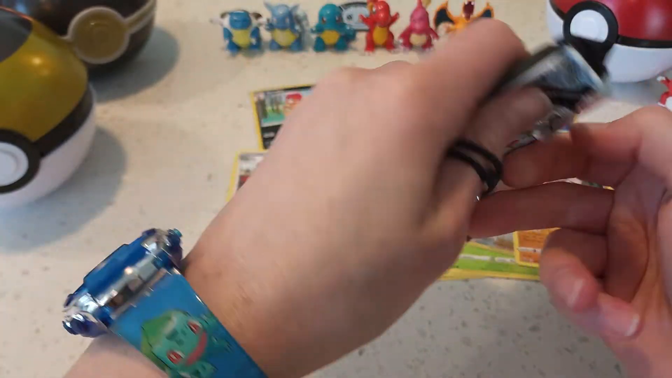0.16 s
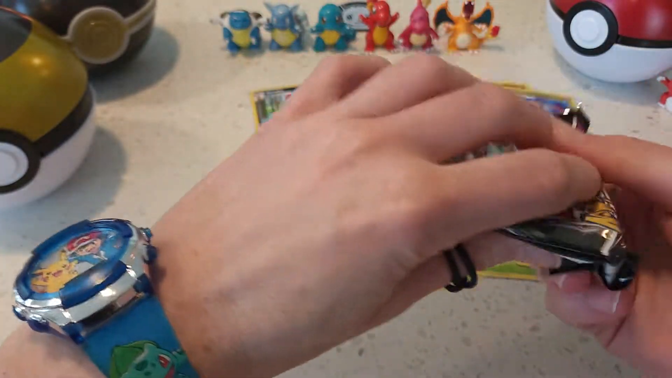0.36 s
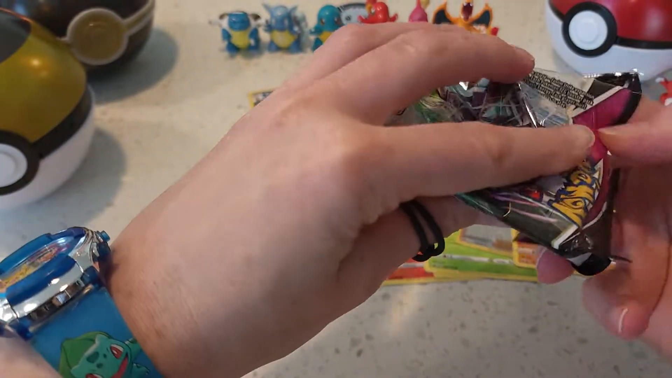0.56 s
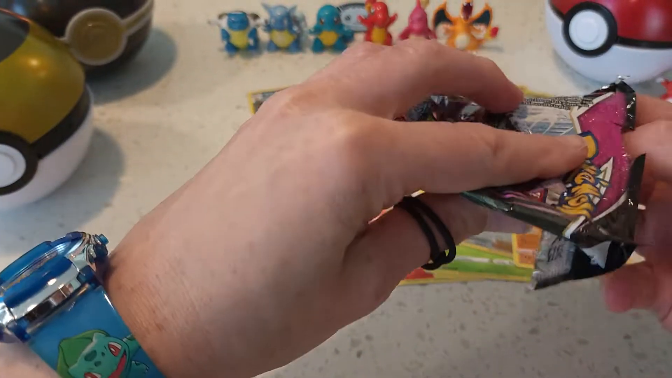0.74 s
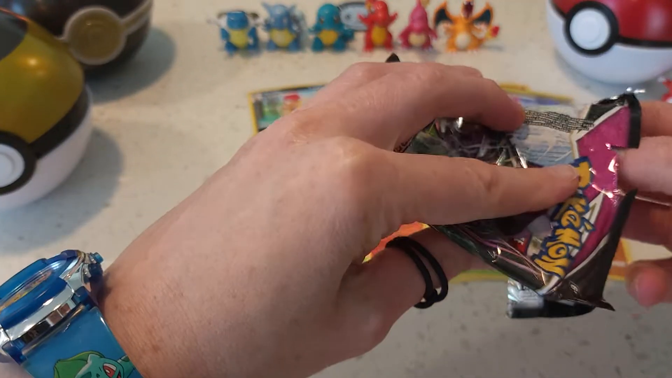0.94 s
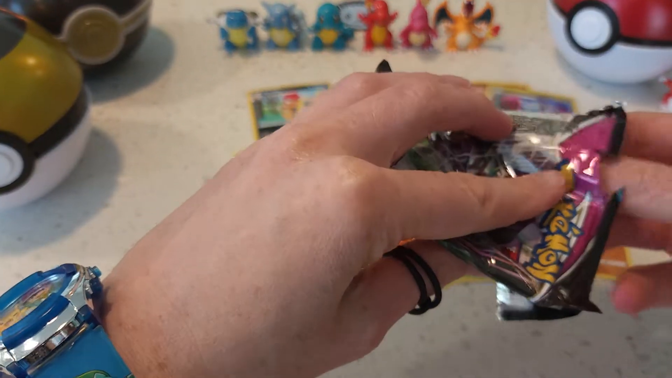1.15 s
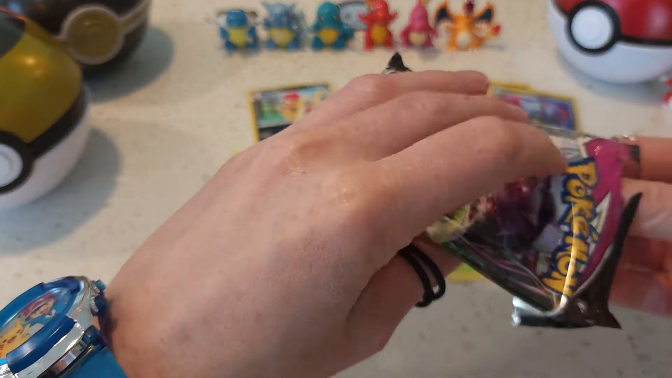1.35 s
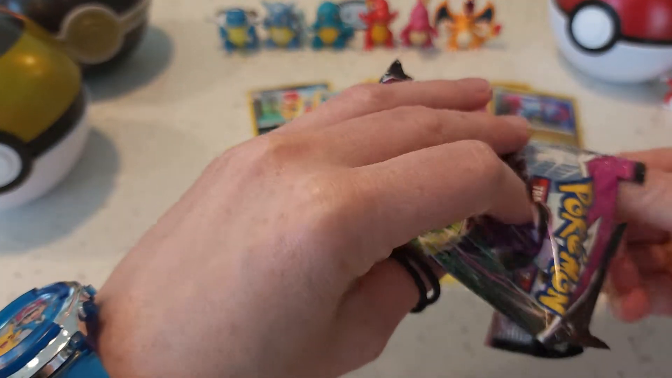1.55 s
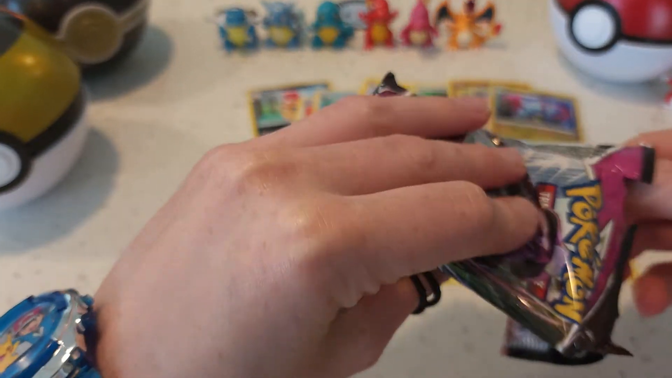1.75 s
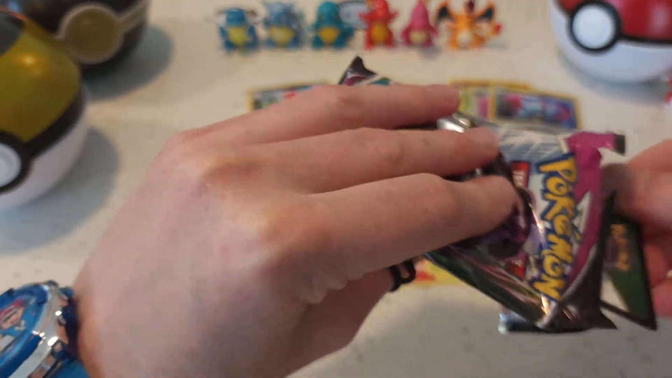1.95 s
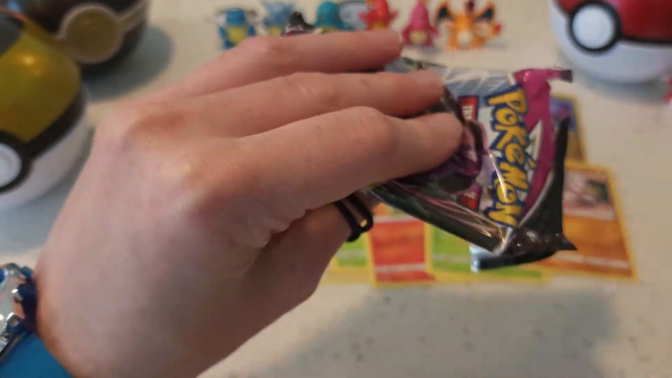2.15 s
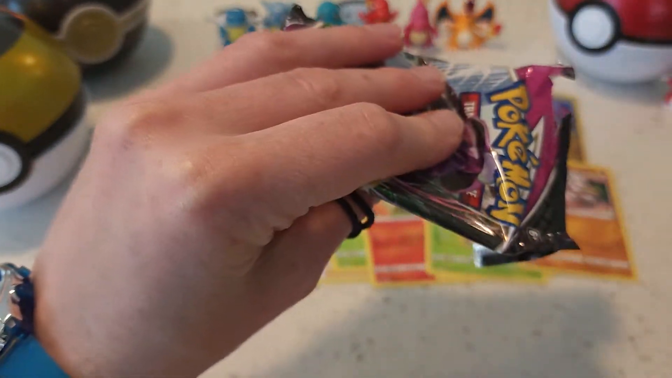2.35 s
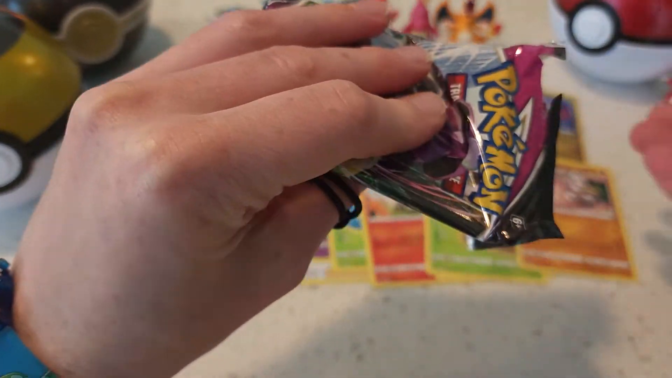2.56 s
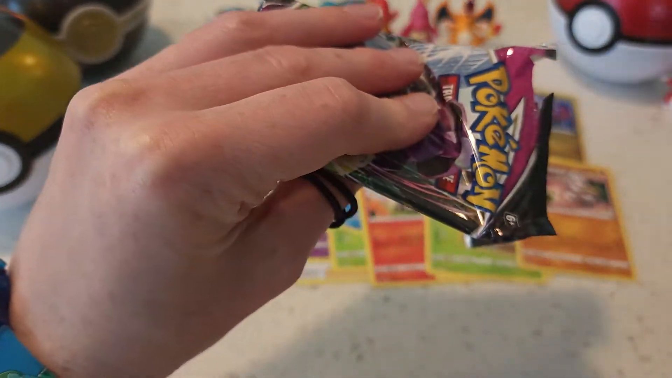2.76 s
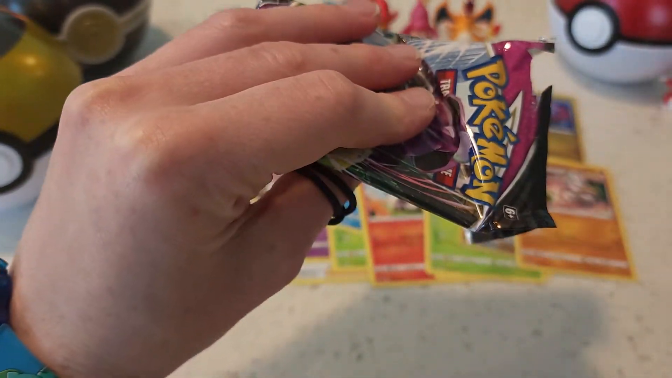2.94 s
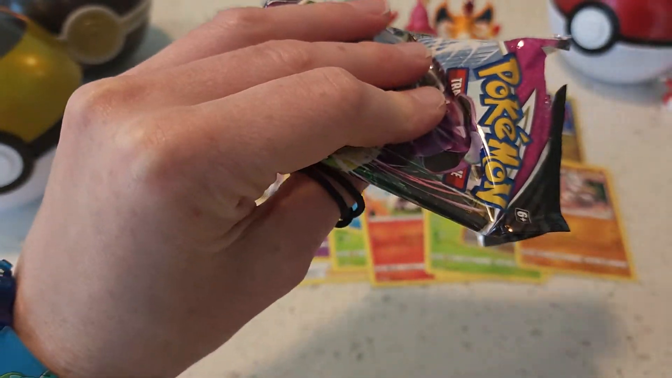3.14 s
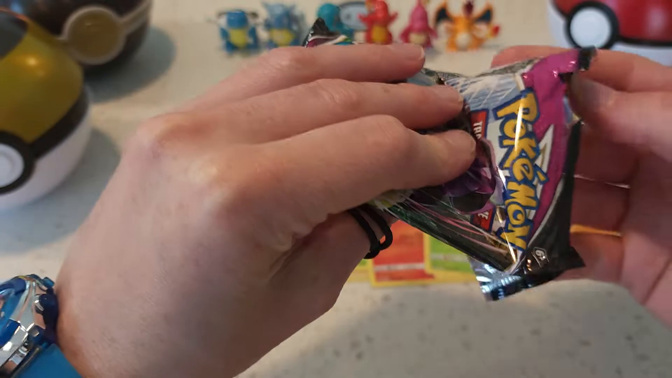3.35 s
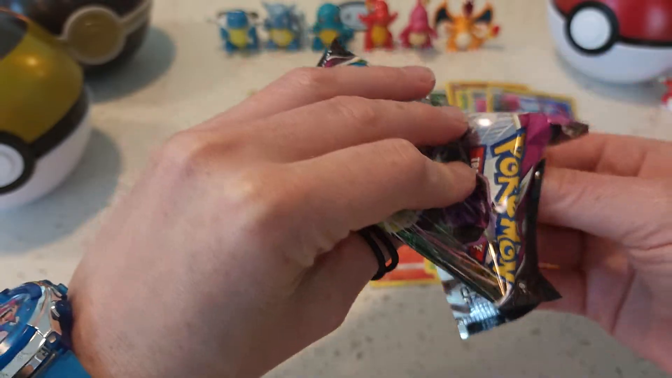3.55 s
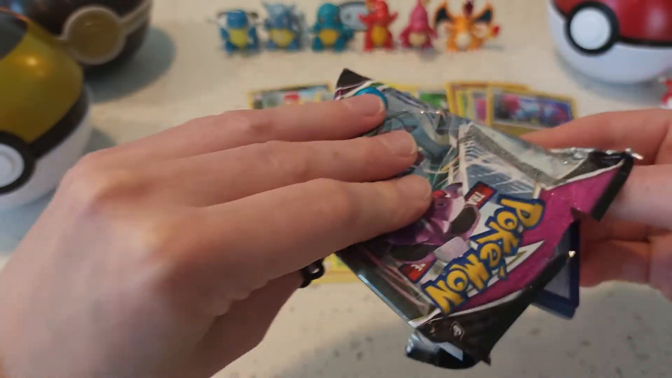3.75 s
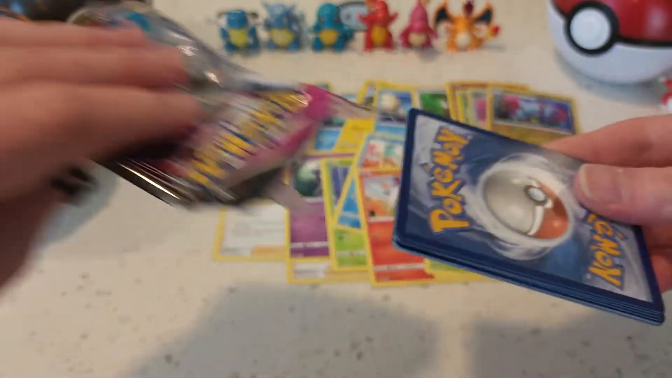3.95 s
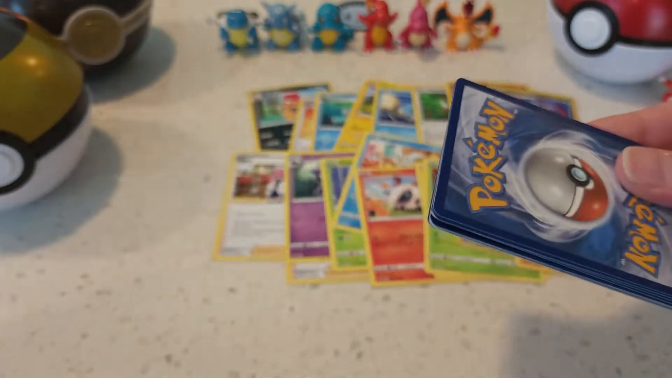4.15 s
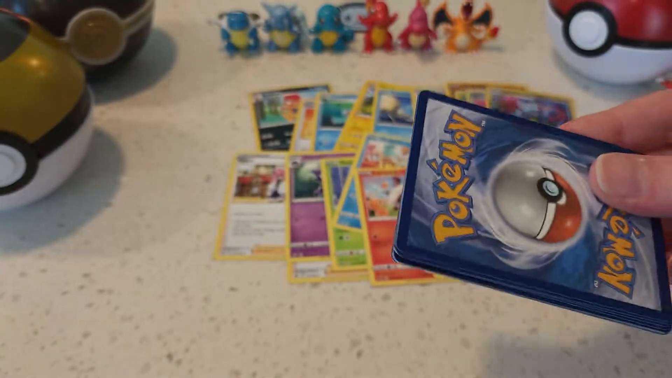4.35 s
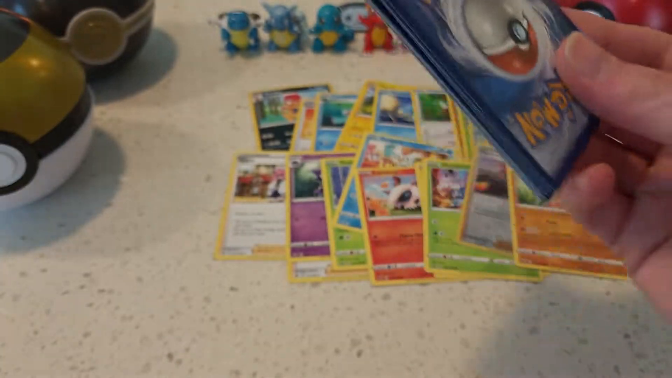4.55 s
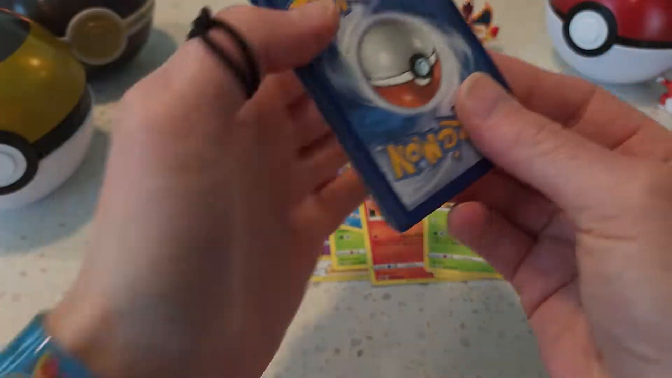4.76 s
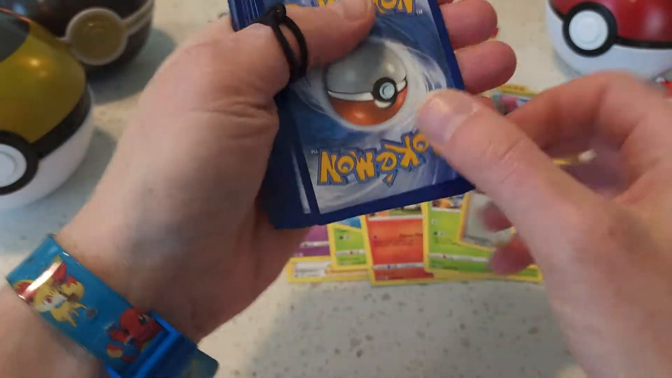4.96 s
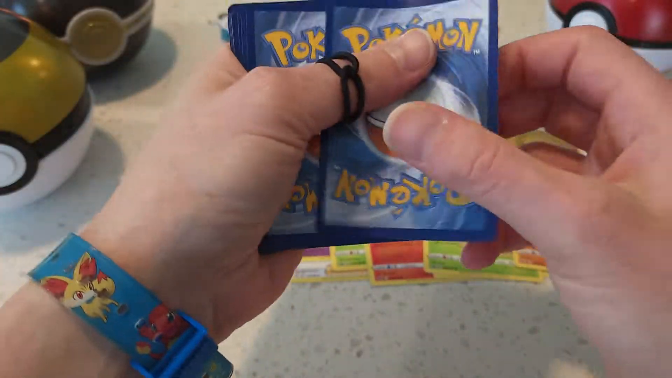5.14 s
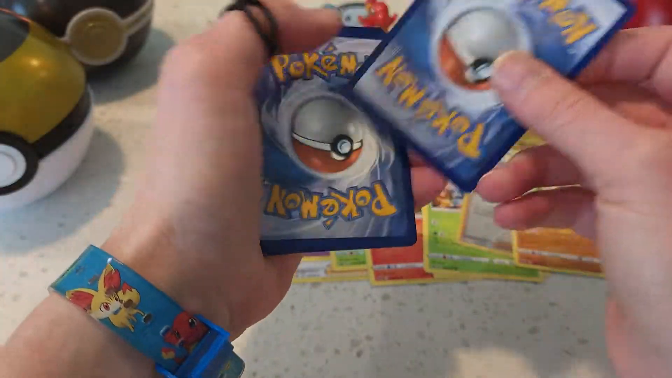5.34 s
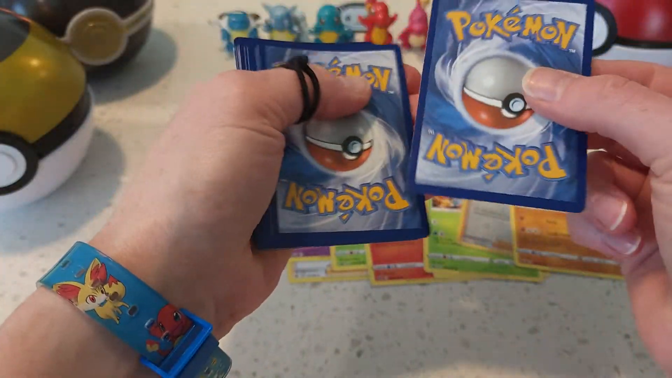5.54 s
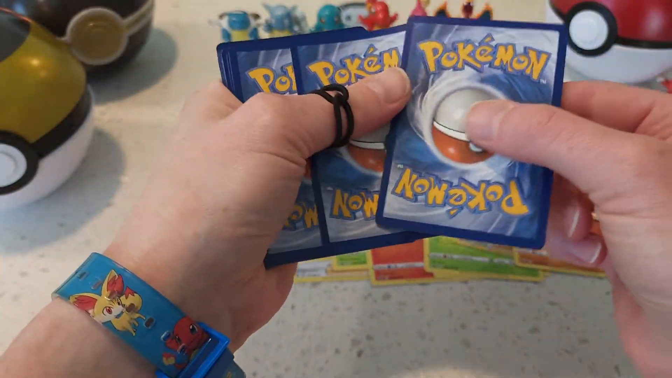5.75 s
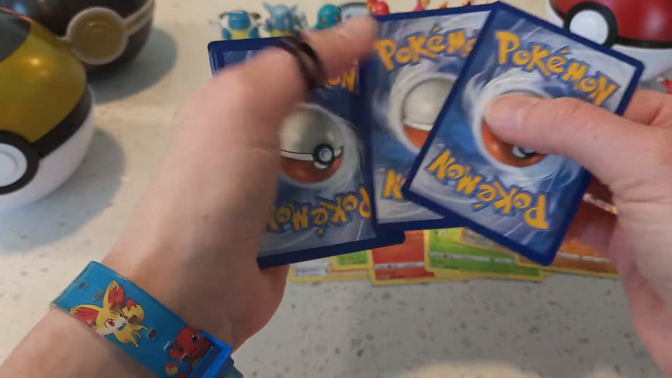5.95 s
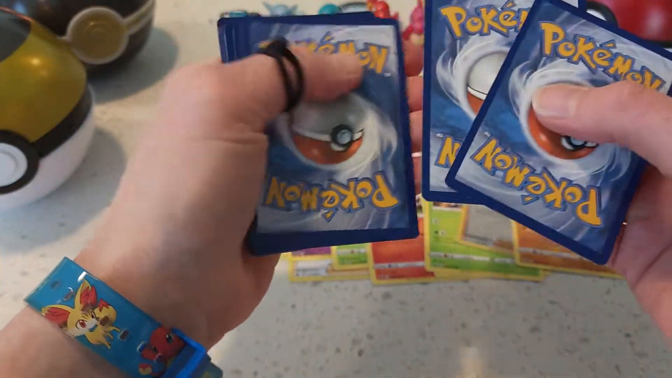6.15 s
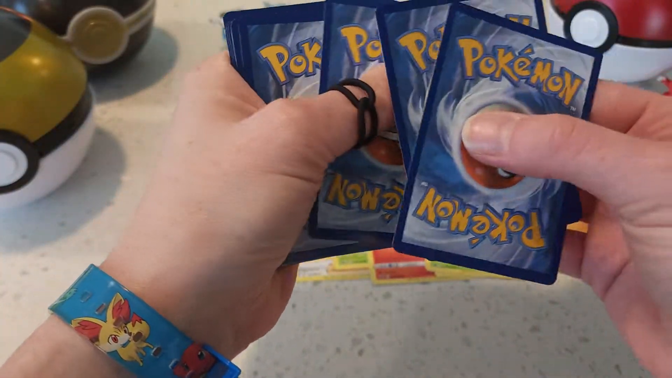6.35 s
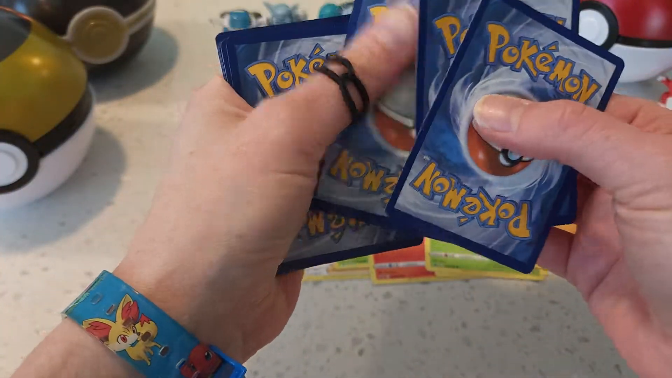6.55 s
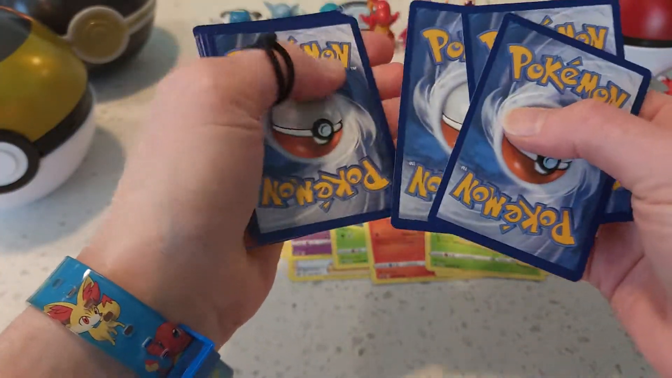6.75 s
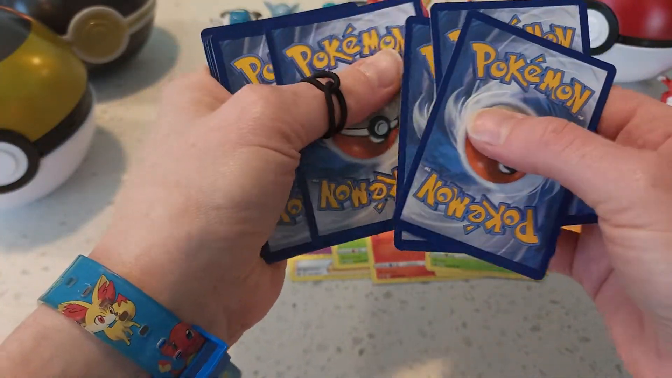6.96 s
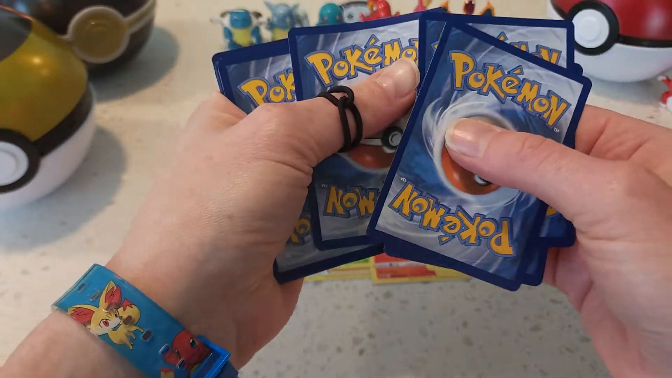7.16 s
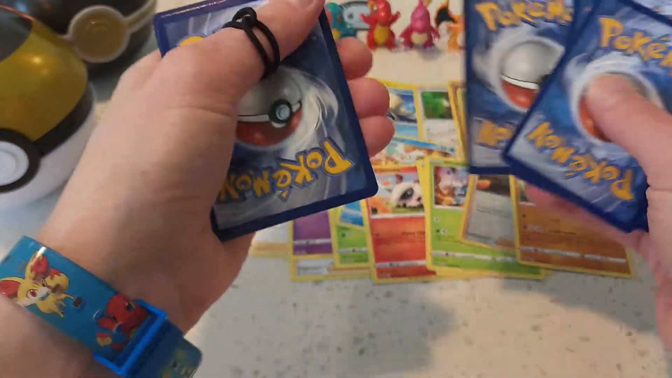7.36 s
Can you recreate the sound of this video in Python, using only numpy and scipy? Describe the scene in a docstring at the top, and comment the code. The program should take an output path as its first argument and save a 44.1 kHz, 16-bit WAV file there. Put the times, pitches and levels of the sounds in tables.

```python
"""Sharp foil snaps over a fine rustle: two hands pull playing cards out of a torn pouch above a table.
Each snap is a burst of tiny slips exciting resonances; the rustle is grainy noise, and both end by about 4.4 s.
Cards join from 2.4 s: edges tick as similar bursts and faces slide as shaped noise, with soft low pats.
A small room answers with decaying noise echoes; a wavering low sine, rumble and faint hiss lie beneath."""
import sys
import numpy as np
from scipy import signal
from scipy.fft import rfft, irfft, next_fast_len
from scipy.io import wavfile
from scipy.ndimage import uniform_filter1d, map_coordinates

SR = 44100
rng = np.random.default_rng(int(sys.argv[2]) if len(sys.argv) > 2 else 0)


def int16_out(signal):
    """Quantize to a 16-bit WAV file."""
    q = np.round(np.clip(np.atleast_2d(signal).T, -1, 1) * 32767)
    wavfile.write(sys.argv[1], SR, q.astype(np.int16))


N = 326340

# Foil dragging on cards and skin: (time [s], level before grains [dB], tilt [dB per octave])
FOIL_DRAG = [(0, -51, -1), (.04, -54, -1.5), (.07, -44, -1.5), (.245, -51, -1.5), (.283, -41, -1.5),
             (.365, -47, 0), (.461, -37, -.6), (.587, -49.5, 0), (.72, -58, -1.5), (1.15, -59, -3),
             (1.21, -48, -3.5), (1.5, -56, -1.5), (1.696, -47, 1.5), (1.744, -61, -2.5), (1.987, -53, 3),
             (2.071, -40, 0), (2.2, -63, -1), (2.345, -77, -2.5), (2.75, -82, 0), (2.85, -76, 2.5),
             (3.07, -73, 2.5), (3.11, -62, 2.5), (3.22, -64, 3), (3.332, -72, 1.5), (3.37, -51, -4),
             (3.44, -62, -4), (3.632, -52, 1), (3.69, -34, 1.5), (3.728, -30, -.5), (3.8, -49, -3),
             (3.835, -44, 0), (3.861, -36.5, 2.5), (3.989, -44, .6), (4.073, -57, 1.5), (4.169, -57, 1.5),
             (4.318, -76, 5)]
# Left-right likeness of the hands, near both microphones: (frequency [Hz], correlation)
NEAR_CORRELATION = [(300, 0.77), (700, 0.8), (1200, 0.55), (2500, 0.38), (7000, 0.048)]
# Left-right likeness of far sound, the room and the rumble: (frequency [Hz], correlation)
FAR_CORRELATION = [(60, 0.98), (130, 1), (290, .75), (640, 1), (1400, 0)]


def amp(db):
    """Amplitude ratio of a level in decibels."""
    return 10 ** (np.asarray(db) / 20)


def unit(x):
    """Normalization to unit root-mean-square."""
    return x / np.sqrt(np.mean(x ** 2) + 1e-20)


def along(points, hz):
    """Interpolation of (frequency [Hz], value) points on a logarithmic frequency axis."""
    f, v = np.transpose(points)
    return np.interp(np.log(hz + 1), np.log(f + 1), v)


def wobble(rate):
    """Smooth random modulation: a spline through normal draws, rate knots a second."""
    knots = rng.standard_normal(int(N * rate / SR) + 4)
    return map_coordinates(knots, [np.arange(N) * rate / SR])


def filtered(x, response):
    """Linear filtering: the spectrum of x times a response of frequency."""
    m = next_fast_len(N + SR // 2)
    spectrum = rfft(x, m) * response(np.fft.rfftfreq(m, 1 / SR))
    return irfft(spectrum, m)[..., :N]


def spread(a, b, hz, correlation):
    """Stereo coherence: rotating two unrelated spectra gives left and right a set correlation."""
    turn = np.arccos(np.clip(along(correlation, hz), -1, 1)) / 2
    shared, opposed = np.cos(turn) * a, np.sin(turn) * b
    return np.array([shared + opposed, shared - opposed])


def mode(f, hz, width):
    """Damped resonator driven at frequency f, with gain 1 at its centre."""
    return 1j * f * width / (hz * hz - f * f + 1j * f * width)


def bursts(s, db, ring_hz, body_db, body_hz, sizzle_db, duration, sharp, broad_db, body_sharp, size=1024):
    """Stick-slip excitation: tiny slips ring a patch of sheet, a larger hollow and a top sizzle."""
    t, f = np.arange(size) / SR, np.fft.rfftfreq(size, 1 / SR)
    draw = rng.standard_normal((len(s), 3, size))
    # a faint 3 ms exponential lead-in, then the slips swell, stop short and leave a faint rattle
    u = np.maximum(t - .003, 0) / (.0007 * duration)
    lead_in = .07 * np.exp(np.minimum(t - .003, 0) / .0012)
    stop = np.exp(-u ** 3) + .1 * np.exp(-t / .006)
    shape = (lead_in + np.tanh(2.5 * u)) * stop
    slips = shape * amp(1.67 * draw[:, 2])  # unevenness shared by both microphones
    force = spread(rfft(draw[:, 0] * slips), rfft(draw[:, 1] * slips), f, NEAR_CORRELATION)
    bounce_s = 0.0009076 * amp(2.5 * draw[:, 2, :1])
    force = force * (1 + 0.31 * np.exp(-2j * np.pi * f * bounce_s))  # reflection off the table top

    patch = mode(f, ring_hz, ring_hz / sharp) + amp(broad_db) * mode(f, 5500, 3500)
    hollow = -mode(f, body_hz, body_hz / body_sharp) + 0.31 * mode(f, 380, 440)  # with a low push
    sizzle = -mode(f, 13600, 11000) ** 2
    total = 0
    for share_db, part in [(0, patch), (body_db, hollow), (sizzle_db, sizzle)]:
        ringing = force * part
        rms = np.sqrt(np.mean(np.abs(ringing) ** 2, axis=(0, 2), keepdims=True))
        total = total + amp(share_db) * ringing / rms
    pair = irfft(total, size)

    power = uniform_filter1d(np.mean(pair ** 2, axis=0), size=40)
    peak = np.sqrt(power.max(axis=1, keepdims=True))  # loudest 0.9 ms
    scaled = pair * amp(db - 5) / peak
    at = (np.round((s - .0037) * SR).astype(int) + np.arange(size)).ravel()
    return np.array([np.bincount(at, side.ravel(), N + size)[:N] for side in scaled])


def friction(level, tilt, spectrum, grit_db, per_s, clump_db, ring_db):
    """Sliding friction: noise with short grains, denser under a harder drag, and a tilted spectrum."""
    chance = per_s * np.sqrt(level / amp(-50.0)) / SR  # per_s holds at a level of -50 dB
    size = amp(grit_db * np.minimum(rng.exponential(size=N), 3))
    kicks = (rng.random(N) < chance) * size
    grains = 1 + signal.lfilter([1], [1, -np.exp(-1 / (0.00072 * SR))], kicks)
    noise = grains * amp(clump_db * wobble(90)) * rng.standard_normal((2, N))

    hz, t, z = signal.stft(noise, SR, nperseg=256)
    hz = hz[:, None]
    # random spectral patches drift slowly over time
    patches = uniform_filter1d(rng.standard_normal(z.shape[1:]), size=24, axis=1)
    tilt_db = np.interp(t, np.arange(N) / SR, tilt) * np.log2((hz + 100) / 4000)
    gain = amp(ring_db * unit(patches) + along(spectrum, hz) + tilt_db)
    band = (hz > 1500) & (hz < 9000)  # the level is held here
    gain = gain / np.sqrt(np.mean(band * gain ** 2, axis=0))
    colored = spread(z[0], z[1], hz, NEAR_CORRELATION) * gain
    return level * signal.istft(colored, SR, nperseg=256)[1][:, :N]


def small_snaps(drag, count):
    """Random buckling of small creases: chance snap rows, louder under a harder drag."""
    draw = rng.standard_normal((count, 4))
    at = (SR * rng.uniform(.01, FOIL_DRAG[-1][0] - .1, count)).astype(int)
    db = 20 * np.log10(drag[at]) + 8 + 2.5 * draw[:, 0]
    ring_hz = 4800 * amp(3 * draw[:, 1])
    pouch_db = -9 + 5 * draw[:, 2]
    duration = 1.3 * amp(3 * draw[:, 3])
    return np.transpose([at / SR, db, ring_hz, pouch_db, duration])


def foil():
    """Buckling and friction: creases snap over the rustle, and the sheet rustles on as it settles."""
    # Loud creases buckling: (time [s], level, 5 dB over the 0.9 ms RMS peak before panning [dB], ring [Hz],
    # pouch hollow relative to ring [dB], duration [0.7 ms])
    snap_events = [(.0332, -29, 7350, -4, 2.9), (.048, -18, 2450, 3, 2.2), (.0565, -23.5, 1910, 1, 2.8),
                   (.0616, -17.5, 1800, 2, 1), (.067, -15.5, 1800, 12, 1.4), (.0708, -17, 7400, -4, 2.1),
                   (.088, -24.5, 1790, 6, 3.2), (.094, -24.5, 4500, -3, 5.1), (.1102, -17, 1840, 5.5, 6.5),
                   (.1372, -14.5, 7000, -13, 4), (.1457, -16.5, 1830, 7, 1.1), (.1867, -21, 3900, -20, 3.3),
                   (.1905, -18, 9000, -3, 3.5), (.221, -28, 1830, 18, 1.9), (.2566, -25.5, 6800, -8, 1.9),
                   (.2745, -26, 5000, -5, 1.7), (.287, -23.5, 2680, -10, 2.5), (.2923, -21.5, 2490, -1, 1),
                   (.2992, -15, 2600, -5, 4.2), (.321, -27.5, 7500, -13, 1.4), (.331, -12, 7400, -21, 1.5),
                   (.341, -21.5, 5260, -6, 1.4), (.3819, -19.5, 6000, 1, 3.5), (.4051, -15, 1800, -3, 4.5),
                   (.4403, -23, 6400, -7, 2.5), (.4485, -18, 3280, -11, 5.2),
                   (.4539, -16.5, 7550, -10, 5.9), (.4712, -10.5, 2660, -21, 2.5),
                   (.4886, -21.5, 7200, -5, 2.6), (.4999, -18, 2340, -9, 1.7), (.536, -22, 7800, -6, 1.9),
                   (.5569, -21.5, 7800, -18, 1.8), (.5611, -18.5, 6750, -9, 2.1),
                   (.6106, -27.5, 4600, -14, 3.7), (.6487, -19, 5730, -3.5, 7.5),
                   (.6643, -17.5, 4600, -14, 1.8), (.7384, -27.5, 6540, 0, 8.4),
                   (.7433, -18.5, 6300, -12, .6), (.7744, -34, 4300, 0, 4.9), (.7938, -30, 3100, 3, 2.6),
                   (.8102, -15.5, 4670, -11, 1.2), (.8667, -20, 10300, -6, 2.3),
                   (.9962, -25.5, 7160, -2, 1.7), (1.0513, -15, 5000, -2.5, 2.5),
                   (1.083, -22.5, 1900, 2.5, 6.8), (1.0915, -22.5, 2340, 0, 2.5),
                   (1.1615, -28.5, 4500, -2, 1.9), (1.1844, -12, 4730, -13, 1.9),
                   (1.1923, -19.5, 5300, -.5, 2.2), (1.2373, -34, 2500, -5, 4.7),
                   (1.302, -31.5, 2360, -4, 2.8), (1.317, -22.5, 5300, 1, 2.4),
                   (1.3278, -19.5, 2400, -4, 2.1), (1.3434, -25.5, 5400, -9, 1.4),
                   (1.3526, -19, 4400, -14, 1.8), (1.358, -5.5, 4400, -8, 2.5),
                   (1.394, -24.5, 4500, 14, 3.7), (1.402, -25.5, 4700, -14, 2.4),
                   (1.4247, -26.5, 5500, -16, 2.8), (1.4662, -23.5, 7600, -13, 1.7),
                   (1.4731, -17, 4630, -1, 3.1), (1.542, -32.5, 6000, -3, 2.4),
                   (1.5523, -9.5, 5500, -17, 2.7), (1.5842, -13, 4900, -19, 1.8),
                   (1.6026, -23.5, 4000, -15, 2.5), (1.634, -18.5, 5600, -21, 1.8),
                   (1.6666, -28, 4800, -10, 2.1), (1.6856, -22.5, 4240, -17.5, 4.2),
                   (1.6905, -25, 3400, -12.5, 2.5), (1.7027, -29.5, 7100, -16, 5.5),
                   (1.8444, -10, 5950, -9.5, 2.1), (1.886, -29.5, 3600, -13, 1.6),
                   (1.9256, -29, 5000, -6, 2.2), (2.0614, -24.5, 4900, -20, 5.3),
                   (2.0767, -23.5, 4430, -2.5, 6.3), (2.1006, -22.5, 8600, -7, 6.6),
                   (2.1186, -23.5, 3130, -4, 3.2), (2.144, -14, 7560, -13, 1),
                   (2.8471, -48, 8030, -14.5, 2.2), (3.3442, -37, 4750, -8, 4.2),
                   (3.3776, -18.5, 1810, 1, 2.9), (3.4162, -33, 3100, -5, 1.7),
                   (3.4543, -28.5, 6960, -14, 4.7), (3.4696, -21, 3450, -5, 2.8),
                   (3.5209, -20.5, 7200, -6.5, 2.8), (3.5392, -21.5, 6200, -24, 1.6),
                   (3.6009, -30.5, 3800, -22, 3.7), (3.607, -28, 7200, -3, 7.7),
                   (3.6416, -29.5, 3900, -2, 8.9), (3.6577, -26.5, 4100, -1, 11),
                   (3.6714, -14, 7200, -24, 1.8), (3.683, -18.5, 5600, -5.5, 4.9),
                   (3.6952, -9.5, 6600, -17, 4.3), (3.7184, -13.5, 4530, -6, 4.4),
                   (3.7252, -17, 3800, -5, 3.4), (3.7472, -15, 4880, -3, 3.6), (3.761, -20.5, 3300, -4, 11),
                   (3.804, -14.5, 8900, -12, 1.6), (3.8496, -19, 9600, -4.5, 3),
                   (3.8533, -16, 4630, -15, 2.4), (3.9883, -27.5, 1800, 5, 2.2),
                   (4.0037, -23, 7000, -14, 2.2), (4.0078, -20.5, 4600, -9, 1.3),
                   (4.038, -31, 10300, -16, 2.6), (4.0585, -32, 4200, -10, 3.9),
                   (4.0879, -37.5, 5040, -8, 3.6), (4.0996, -32, 10300, -10, 3.2),
                   (4.121, -40, 6000, -1, 1.9), (4.1646, -29, 4500, -9, 4), (4.2343, -43.5, 4640, -6, 3.1),
                   (4.248, -41.5, 6000, -7, 2.7), (4.291, -43, 6040, -11, 3.9), (4.336, -22, 4500, -1, 3.2),
                   (4.3408, -23, 1780, 5, 2.3)]
    # The grip changes the pouch: (time [s], hollow centre before scatter [Hz], sizzle of a 5 kHz snap [dB])
    grip = [(0, 1350, -2.5), (.2, 1700, -2.5), (.3, 1750, -8), (.38, 950, -4), (1.5, 950, -6),
            (1.9, 1150, -5), (2.1, 900, -3.5), (3.4, 1550, -14), (3.7, 1100, -6), (4.3, 850, -1.5)]
    # Foil friction spectrum before tilt and normalization: (frequency [Hz], relative level [dB])
    foil_spectrum = [(200, -16.5), (450, -3), (1000, -5), (2000, 1.8), (7500, 3), (11500, -5), (16000, -6)]
    settle_db, settle_db_per_s = -40, 150  # rustle left by a snap of duration 1, re its level; decay rate
    sizzle_db_per_octave = 1.5  # higher rings sizzle more

    t, (when, level_db, tilt) = np.arange(N) / SR, np.transpose(FOIL_DRAG)
    drag = amp(np.interp(t, when, level_db, right=-120))
    events = np.vstack([snap_events, small_snaps(drag, count=120)])
    s, db, ring_hz, pouch_db, duration = events.T[:, :, None]
    grip_s, hollow_hz, top_db = np.transpose(grip)
    scatter = amp(.8 * rng.standard_normal(s.shape))  # from snap to snap
    pouch_hz = np.interp(s, grip_s, hollow_hz) * scatter
    sizzle_db = np.interp(s, grip_s, top_db) + sizzle_db_per_octave * np.log2(ring_hz / 5000)
    snaps = bursts(s, db, ring_hz, pouch_db, pouch_hz, sizzle_db, duration,
                   sharp=8, broad_db=-6, body_sharp=2.5)

    jolt_power = amp(db + settle_db) ** 2 * duration
    jolts = np.bincount((s * SR).astype(int).ravel(), jolt_power.ravel(), N)
    settling = signal.lfilter([1], [1, -amp(-settle_db_per_s / SR) ** 2], jolts)
    level = np.sqrt(drag ** 2 + settling)
    rustle = friction(level, np.interp(t, when, tilt), foil_spectrum,
                      grit_db=2.5, per_s=220, clump_db=2.1, ring_db=3.2)
    return snaps + rustle


def hum():
    """Frequency and amplitude modulation: a wavering sine over correlated house rumble and faint hiss."""
    # Rumble and hiss spectrum before normalization: (frequency [Hz], relative level [dB])
    bed_spectrum = [(22, -9.5), (31, -18), (41, -5), (60, -3), (80, -6.5), (135, -6), (190, -16.5),
                    (270, -14.5), (400, -28.5), (700, -39), (1500, -43), (7000, -63), (10000, -66),
                    (16000, -76)]
    # The hum swells and sinks: (time [s], mean sine amplitude [dB])
    swell = [(0, -52), (.45, -67), (1.8, -60), (2.299, -58.5), (3.898, -54.5), (4.499, -71.5), (6.2, -64),
             (6.75, -53), (7.4, -60)]
    a, b = rng.standard_normal((2, N))
    m = next_fast_len(N)
    hz = np.fft.rfftfreq(m, 1 / SR)
    spectra = spread(rfft(a, m), rfft(b, m), hz, FAR_CORRELATION) * amp(along(bed_spectrum, hz))
    bed = unit(irfft(spectra, m)[:, :N])
    level_db = np.interp(np.arange(N) / SR, *np.transpose(swell)) + 3.4 * wobble(5)
    phase = 2 * np.pi * np.cumsum(57 + 4 * wobble(7.2)) / SR  # around 57 Hz
    return amp(-57) * bed + amp(level_db) * np.sin(phase)


def room(x, step=8192):
    """Reverberation: decaying noise echoes start after 9 ms, redrawn at random every 0.19 s."""
    # Reverberation time: (frequency [Hz], time to decay by 60 dB [s])
    decay = [(300, 0.47), (2000, 0.25), (6000, 0.43), (14000, 0.35)]
    out = np.zeros((2, N + SR))
    for at in range(0, N, step):
        hz, t, z = signal.stft(rng.standard_normal((2, SR // 2)), SR, nperseg=256)
        hz = hz[:, None]
        z = spread(z[0], z[1], hz, FAR_CORRELATION) * amp(-60 * t / along(decay, hz))
        tail = signal.istft(z, SR, nperseg=256)[1][:, :SR // 2]
        wet = signal.fftconvolve(x[None, at:at + step], tail / np.linalg.norm(tail[0]), axes=1)
        out[:, at + 400:][:, :wet.shape[1]] += wet
    return out[:, :N]


def pats():
    """Heavily damped oscillation: a soft contact gives a few low cycles and no lasting ring."""
    # Soft blows of the stack on hand or table: (time [s], level before onset and decay [dB], frequency [Hz])
    blows = [(0.643, -34, 338), (2.415, -40.5, 235), (3.373, -38, 404), (4.338, -29, 330),
             (4.465, -41, 244), (6.467, -31, 112), (6.621, -35.5, 251), (7.353, -30, 250)]
    out, t = np.zeros(N + SR), np.arange(SR // 10) / SR
    for s, db, hz in blows:
        envelope = amp(db - 60 * t / .036) * (1 - np.exp(-t / .0005))
        out[round(s * SR):][:len(t)] += envelope * np.sin(2 * np.pi * hz * t)
    return out[:N]


def cards():
    """Impact and friction: edges tick, faces slide, and the stack flexes at one low pitch."""
    # Card edges catching and slapping: (time [s], level, 5 dB over the 0.9 ms RMS peak before panning [dB],
    # ring [Hz], flex relative to ring [dB], duration [0.7 ms])
    edge_events = [(2.4159, -21, 4600, -3, 10.6), (2.619, -47.5, 4550, -7, 2.1),
                   (4.469, -36, 4330, -6, 2.7), (4.5484, -41, 4560, -7, 2.7), (4.636, -38, 7800, -3, 1.9),
                   (4.6866, -39, 2620, -23, 4.4), (4.8587, -34, 3060, -7, 2.1),
                   (5.1963, -38.5, 4000, -2, 12), (5.212, -37, 2800, 4, 1.1), (5.2511, -39, 2920, 13, 13),
                   (5.3216, -35.5, 2610, -4.5, 6.5), (5.5349, -47.5, 1920, -8.5, 15),
                   (5.6919, -41, 3630, -5.5, 9.9), (5.7553, -35, 2620, -4, 2.7),
                   (5.806, -34, 2460, -9, 2.8), (5.8579, -38, 1870, -3, 1.6), (5.883, -39, 1900, -5.5, 6.1),
                   (5.8888, -37, 1900, 8, 2.2), (5.9443, -36, 3930, -2.5, 1.9),
                   (6.278, -46, 3870, -3.5, 4.2), (6.466, -23.5, 2480, -3.5, 2.7),
                   (6.6147, -28, 7700, -20.5, 1.6), (6.7508, -40, 1950, -7, 3.8),
                   (6.7768, -42.5, 2170, -2, 4.6), (7.0836, -46, 1940, -2.5, 4.8),
                   (7.1046, -36, 2370, -5.5, 6.5), (7.1748, -38, 4300, -8, 2.7),
                   (7.18, -37, 4250, 2.5, 4.8), (7.1957, -25.5, 3160, -24, 3.4),
                   (7.2417, -38, 6440, -2, 9.6), (7.3614, -22, 1900, -1, 2.2)]
    # Faces sliding, one stroke a row: (loudest time [s], level before grains [dB], rise over 20 dB [s],
    # fall over 20 dB [s], tilt [dB per octave])
    slides = [(2.43, -46, .02, .13, 2.5), (4.345, -44.5, .012, .09, 1.5), (4.64, -61, .5, .2, 2.5),
              (4.867, -59, .045, .28, 3.5), (5.17, -57, .3, .1, 2.5), (5.226, -49.5, .05, .08, 3),
              (5.34, -53, .04, .2, 3.5), (5.375, -56.5, .1, .04, 4.5), (5.62, -62, .16, .12, 8),
              (5.717, -56, .06, .07, 5), (5.761, -54, .03, .07, 4), (5.817, -49.5, .025, .09, 3.5),
              (5.937, -56.5, .25, .11, 1.8), (6.102, -62, .06, .3, 4.5), (6.308, -59, .25, .5, 3.5),
              (6.39, -60, .2, .05, 1.2), (6.473, -47.5, .02, .075, 1.8), (6.609, -53.5, .1, .075, 3),
              (6.781, -57.5, .06, .075, 1.2), (6.914, -58.5, .035, .55, 4.5), (7.108, -55.5, .08, .04, -1),
              (7.206, -49, .035, .14, 2.8), (7.33, -57, .25, .4, 7)]
    # Card friction spectrum before tilt and normalization: (frequency [Hz], relative level [dB])
    card_spectrum = [(180, 11), (400, -10), (830, 7.5), (1400, -1.5), (1950, 5.5), (2700, -0.5),
                     (3600, 0.5), (10900, -9.5), (16000, -13)]
    s, db, ring_hz, flex_db, duration = np.transpose(edge_events)[:, :, None]
    ticks = bursts(s, db, ring_hz, flex_db, body_hz=600, sizzle_db=-12, duration=duration,
                   sharp=5.6, broad_db=-12, body_sharp=0.54)

    t, fine = np.arange(0, N, 64) / SR, np.arange(N) / SR
    s, db, rise, fall, tilt = np.transpose(slides)[:, :, None]
    drop_db = 20 * np.maximum((s - t) / rise, (t - s) / fall)
    power = amp(db - drop_db) ** 2 + 1e-14
    total = power.sum(axis=0)
    level = np.interp(fine, t, np.sqrt(total))
    mean_tilt = np.interp(fine, t, (tilt * power).sum(axis=0) / total)  # the louder stroke prevails
    return ticks + friction(level, mean_tilt, card_spectrum, grit_db=2.5, per_s=80, clump_db=1.8, ring_db=3)


def scene():
    """Superposition: panned near sources, their room echoes and the hum add."""
    # Where the hands are: (time [s], left minus right [dB])
    hand_place = [(0.0, -1), (2.88, -2.5), (4.59, 2.5), (7.4, 0)]
    near = foil() + cards() + pats()
    pan_db = np.interp(np.arange(N) / SR, *np.transpose(hand_place))
    direct = near * amp([pan_db / 2, -pan_db / 2])
    return direct + amp(-16) * room(near[0]) + hum()


def record(dry):
    """Band limiting: the top is 32 dB lower from 15.95 kHz and silent from 16.995 kHz."""
    def response(hz):
        return (hz < 16995) * np.where(hz < 15950, 1, amp(-32))
    return filtered(dry, response)


dry = scene()
out = record(dry)
int16_out(out)
```